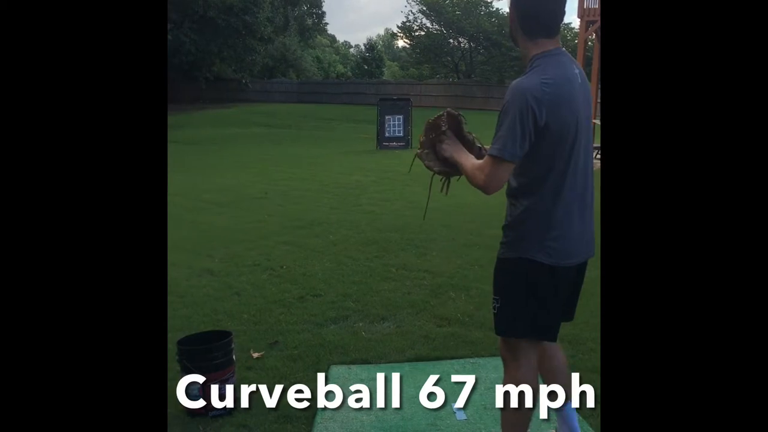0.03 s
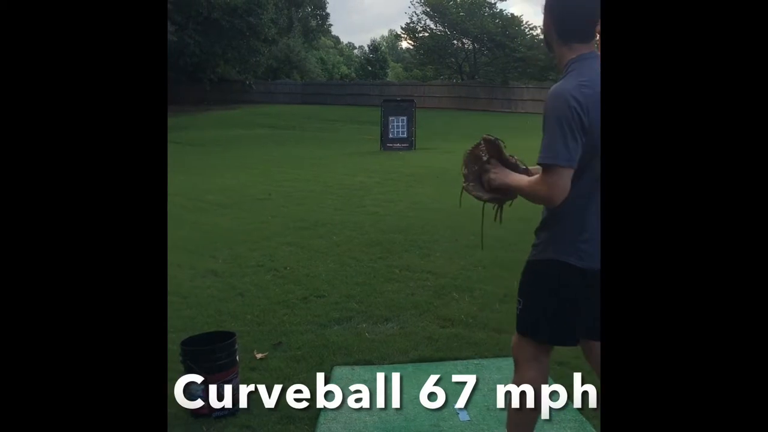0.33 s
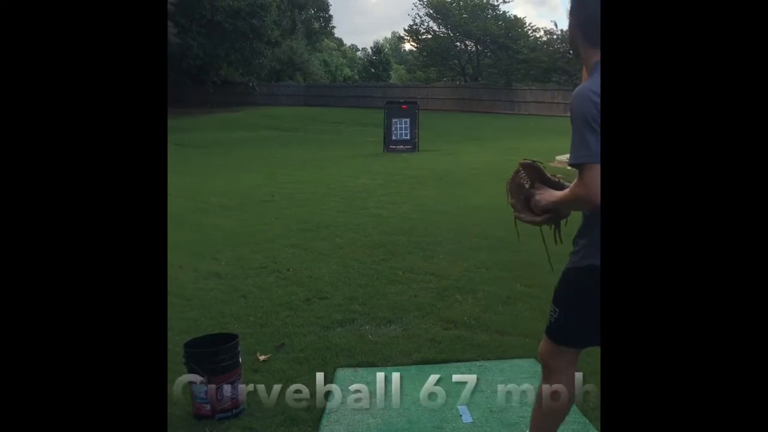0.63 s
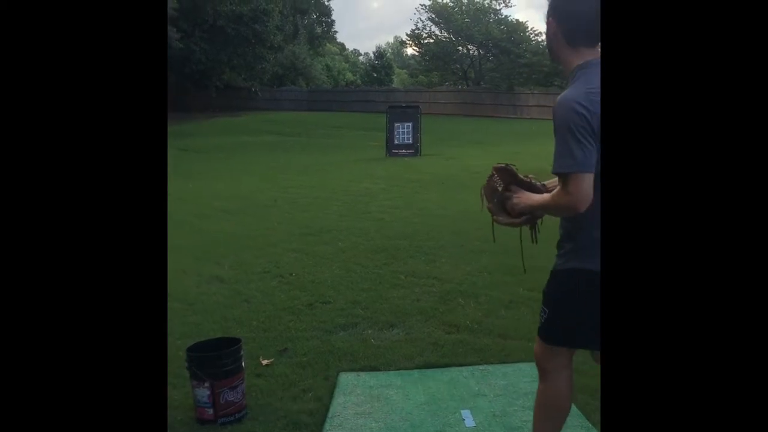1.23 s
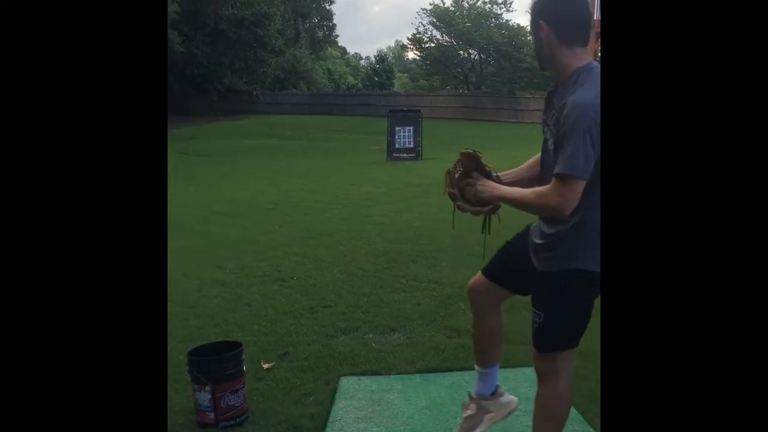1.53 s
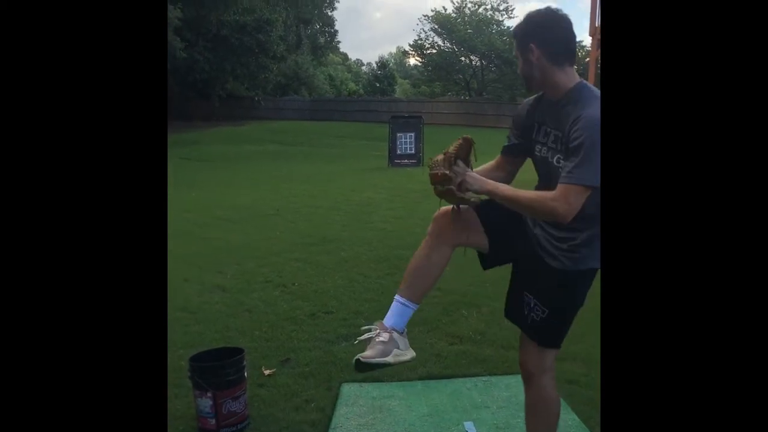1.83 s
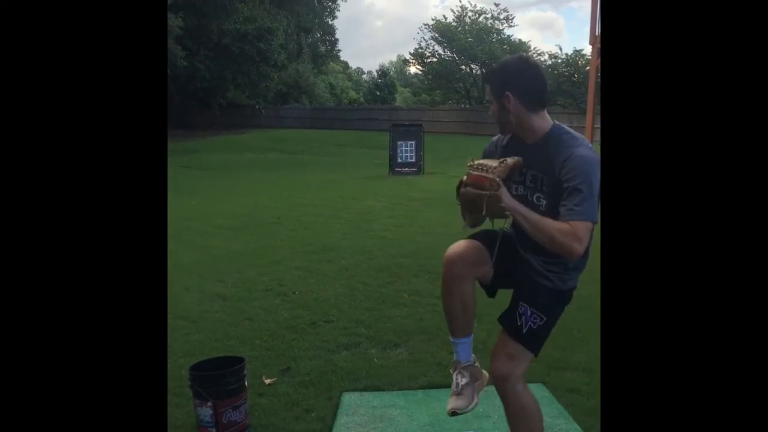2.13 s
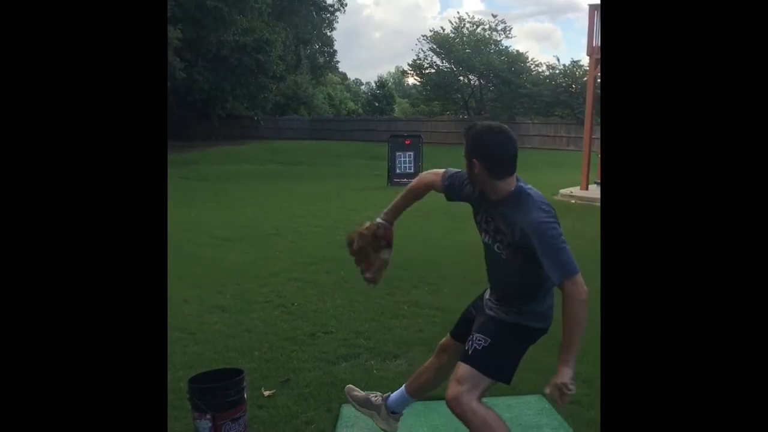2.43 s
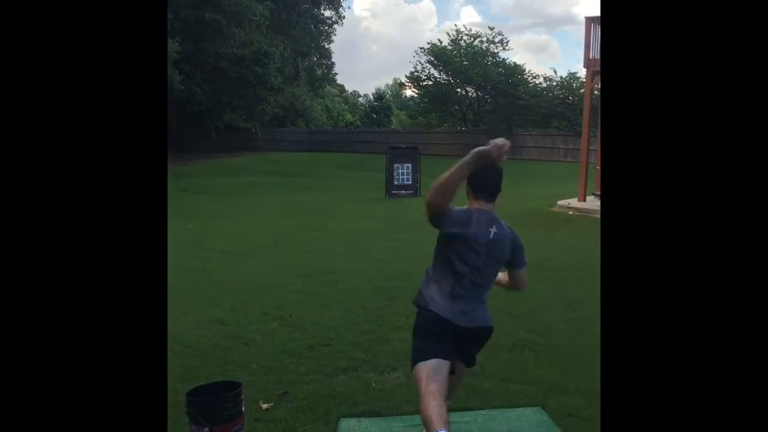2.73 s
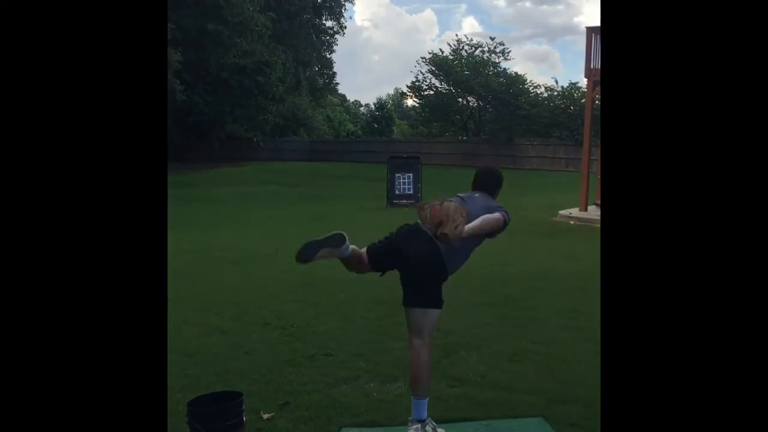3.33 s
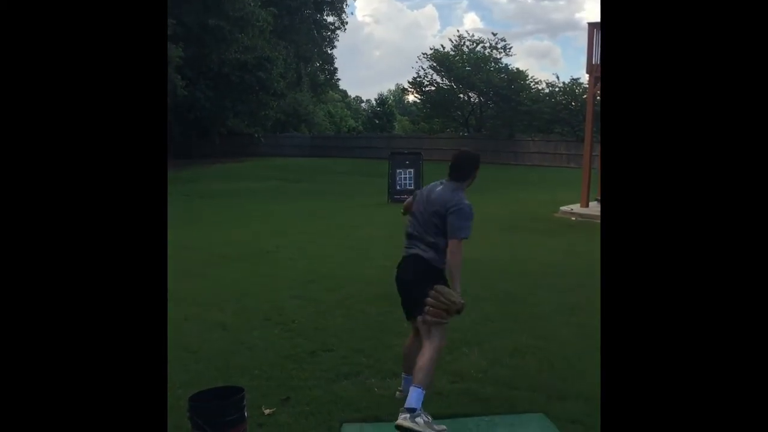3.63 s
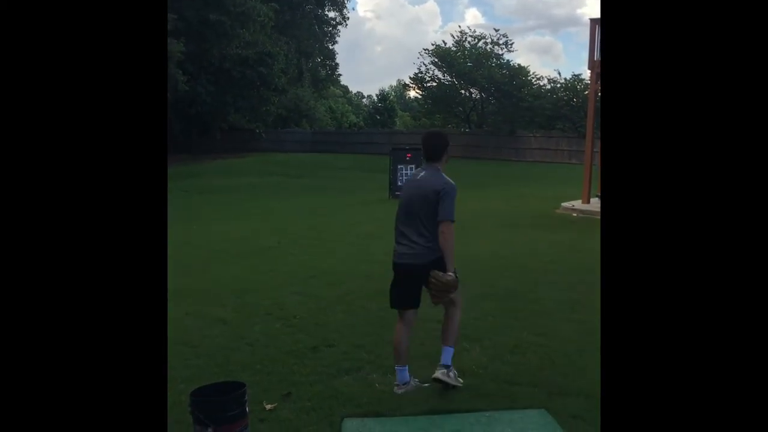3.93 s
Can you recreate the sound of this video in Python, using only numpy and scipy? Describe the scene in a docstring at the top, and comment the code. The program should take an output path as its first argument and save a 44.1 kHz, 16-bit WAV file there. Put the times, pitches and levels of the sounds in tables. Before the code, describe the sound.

A pitched baseball hits a backstop with one very loud, rattling bang that echoes around a quiet backyard. Before it come faint distant birds, then shoe scuffs, rustling clothes and the thud of a stride.

```python
"""Backyard pitch into a backstop

A pitcher winds up on a turf mat in a quiet yard, with birds calling far away. Shoes scuff,
clothes rustle and the stride lands with a thud. The ball bangs into the backstop: its panel
booms and rattles, its frame rings, and fence, house and trees throw the bang back."""
import sys
import numpy as np
from scipy import signal
from scipy.fft import rfft, irfft
from scipy.io import wavfile
from scipy.ndimage import uniform_filter1d

SR = 44100
rng = np.random.default_rng(int(sys.argv[2]) if len(sys.argv) > 2 else 0)


def to_wav(s):
    """Save 16-bit WAV."""
    ch = np.atleast_2d(s).T  # columns
    pcm = np.round(np.clip(ch, -1, 1) * 32767)  # PCM
    wavfile.write(sys.argv[1], SR, pcm.astype(np.int16))


N = 176400
T = np.arange(SR) / SR  # 1 s event clock
HIT_S, RESPONSE_LAG_S = 3.4893, 0.0013


def amp(db):
    """dB to gain."""
    return 10 ** (np.asarray(db) / 20)


def unit(x):
    """Scale to rms 1."""
    return x / np.sqrt(np.mean(x ** 2) + 1e-20)


def log_interp(points, hz):
    """Table lookup on a log-frequency axis."""
    f, value = np.transpose(points)
    return np.interp(np.log(hz + 1), np.log(f + 1), value)


def add(mix, start_s, sound):
    """Mix a sound in at start_s."""
    part = mix[max(round(start_s * SR), 0):][:len(sound)]
    part += sound[:len(part)]


def wander(span_s):
    """Random drift, rms 1, smoothed over span_s."""
    return unit(uniform_filter1d(rng.standard_normal(N), max(round(span_s * SR), 1)))


def noise(spectrum, tilt_db_oct=0, body_hz=None, size=SR, body_db=5, body_oct=0.58):
    """Shaped noise, rms 1, with optional tilt and broad resonance."""
    hz = np.fft.rfftfreq(size, 1 / SR)
    db = log_interp(spectrum, hz) + tilt_db_oct * np.log2(hz + 1)
    if body_hz:
        db += body_db * np.exp(-(np.log2((hz + 1) / body_hz) / body_oct) ** 2)
    return unit(irfft(rfft(rng.standard_normal(size)) * amp(db), size))


def decaying_noise(spectrum, t60s, window):
    """1 s of shaped noise, each band with its own T60."""
    hz, t, bands = signal.stft(noise(spectrum), SR, nperseg=window)
    decay = amp(-60 * t / log_interp(t60s, hz)[:, None])
    return signal.istft(bands * decay, SR, nperseg=window)[1][:SR]


# air spectrum: f/Hz, relative density/dB
AIR_SPECTRUM = [(15, -43), (25, -19.5), (59, 2), (80, -6.5), (114, -5.5), (256, -16.5), (285, -15.5),
                (489, -22.5), (575, -23), (887, -21), (1040, -23.5), (1190, -24.5), (9570, -43),
                (16000, -50.5)]

def air(level_db=-53):
    """Steady outdoor rumble and faint hiss."""
    return amp(level_db) * noise(AIR_SPECTRUM, size=N)


# bird notes: t/s, length/s, start f/Hz, end f/Hz, arch/Hz, level/dB
BIRD_NOTES = [(0.005, 0.052, 3170, 3110, 0, -67), (0.07, .055, 3120, 3430, 122, -64),
              (0.055, 0.12, 2570, 2600, 25, -66), (0.187, 0.07, 2430, 2680, -170, -64),
              (.26, 0.067, 2640, 2360, 39, -65), (0.688, .06, 3520, 3260, 30, -67),
              (0.754, 0.052, 2590, 2440, -20, -68), (1.112, 0.05, 2570, 2670, 0, -68.5)]

def birds(warble=0.014, echo_db=-3, echo_t60_s=0.45):
    """Distant arching, warbling whistles, blurred by the trees."""
    out = np.zeros(N)
    for start_s, length_s, from_hz, to_hz, arch_hz, db in BIRD_NOTES:
        progress = np.arange(0, length_s, 1 / SR) / length_s
        arch = np.sin(np.pi * progress)
        hz = from_hz + (to_hz - from_hz) * progress + arch_hz * arch
        hz *= 1 + warble * wander(0.0085)[:len(hz)]
        add(out, start_s, amp(db) * arch * np.sin(2 * np.pi * np.cumsum(hz) / SR))
    echo = rng.standard_normal(SR) * amp(-60 * T / echo_t60_s)
    return out + amp(echo_db) * signal.fftconvolve(out, echo / np.linalg.norm(echo))[:N]


# footfalls: t/s, f/Hz, level/dB, decay/s
FOOTFALLS = [(.215, 191.6, -44, 0.031), (0.421, 56, -45.5, 0.047), (0.544, 106, -42, 0.029),
             (.555, 51, -42, 0.048), (1.436, 204, -46, 0.017), (1.444, 63.7, -38, 0.045),
             (2.695, 210, -18.5, 0.0084), (2.712, 91, -26.5, 0.037), (2.7427, 125.6, -10.5, 0.0091),
             (2.743, 256, -17.5, 0.0054), (2.765, 64, -17, 0.021), (2.878, 77.6, -33.5, 0.025)]
# ground noise: f/Hz, relative density/dB
GROUND_SPECTRUM = [(30, -31), (100, 5), (350, -8.5), (700, -21.5), (2000, -57), (8000, -62)]
FOOT_RISE_S = 0.0018

def footfalls(dirt_db=-9):
    """Feet thud on mat and ground: a damped low tone plus dull noise."""
    out = np.zeros(N)
    for start_s, hz, db, decay_s in FOOTFALLS:
        thud = np.sin(2 * np.pi * hz * T) + amp(dirt_db) * noise(GROUND_SPECTRUM)
        envelope = np.minimum(T / FOOT_RISE_S, 1) * np.exp(-T / decay_s)
        add(out, start_s, amp(db) * envelope * thud)
    return out


# snaps: t/s, level/dB, tilt/(dB/oct)
SNAPS = [(.219, -47, 0), (1.647, -43, 1), (2.154, -48, 5), (2.285, -44, 4), (2.321, -32, -4.5),
         (2.356, -40.5, 12), (2.406, -36.5, 1), (2.607, -33, 8), (2.6343, -36, 4), (2.6459, -30.5, -5),
         (2.6525, -21.5, 0.5), (2.6737, -17.5, 8), (2.683, -28, 0.5), (2.694, -26, 2), (2.714, -34, 7),
         (2.7326, -23.5, -5.5), (2.741, -17, -4.5), (3.096, -40.5, 11), (3.27, -43, -3)]
# snap spectrum: f/Hz, relative density/dB
SNAP_SPECTRUM = [(300, -17.5), (1500, 15.5), (4000, 8), (9000, 2), (16000, -15)]

def snaps(decay_s=0.00038):
    """Cloth, glove laces and grass snap in sharp noise bursts."""
    out = np.zeros(N)
    for start_s, db, tilt in SNAPS:
        add(out, start_s, amp(db) * np.exp(-T / decay_s) * noise(SNAP_SPECTRUM, tilt))
    return out


# scuffs and hiss: peak t/s, rise/s, fall/s, level/dB, tilt/(dB/oct), body f/Hz
SWELLS = [(.222, 0.0057, 0.041, -56, 1.9, 2300), (.42, .08, 0.085, -69, 2, 4000),
          (1.355, .05, 0.076, -56, 1, 1920), (1.431, 0.0045, 0.0049, -43.5, 1.5, 840),
          (2.287, 0.0042, 0.007, -48.5, -2, 1600), (2.324, .007, 0.043, -50.5, -.5, 1560),
          (2.406, 0.003, 0.022, -53.5, -3.5, 1200), (2.53, 0.11, 0.067, -62, 0, 1300),
          (2.595, 0.0054, 0.051, -47.5, -4, 1130), (2.648, 0.0042, 0.012, -38, -2, 1270),
          (2.661, 0.0069, 0.021, -37, 0, 2920), (2.734, 0.042, 0.016, -38, 0, 1530),
          (2.775, 0.041, 0.039, -46, 0.5, 800), (2.845, .013, 0.032, -42.5, -2, 1250),
          (2.96, 0.13, 0.13, -56, .7, 1170), (2.962, 0.0089, .012, -48.5, -5.5, 1600),
          (3.195, 0.12, 0.054, -51, -1, 2260), (3.56, .018, .025, -34, -2, 9000),
          (3.96, .08, .15, -63, 6, 12000)]
# swell spectrum: f/Hz, relative density/dB
SWELL_SPECTRUM = [(200, -12), (600, -0.5), (1200, -2), (2300, -6), (3700, -7.5), (5000, -14), (6200, -8),
                  (7700, -15), (9400, -13.5), (10500, -17), (16000, -15.5)]

def scuffs_and_hiss(grain_db=2, grain_s=0.0007, clump_db=2, clump_s=0.007):
    """Swells of grainy noise: shoe and cloth scuffs, then high hiss trailing the bang."""
    out, t = np.zeros(N), np.arange(N) / SR
    for peak_s, rise_s, fall_s, db, tilt, body_hz in SWELLS:
        grains = unit(amp(grain_db * wander(grain_s) + clump_db * wander(clump_s)))
        swell = np.exp(-np.where(t < peak_s, ((t - peak_s) / rise_s) ** 2, (t - peak_s) / fall_s))
        out += amp(db) * swell * grains * noise(SWELL_SPECTRUM, tilt, body_hz, size=N)
    return out


def ring(modes):
    """Damped sines struck together."""
    return sum(amp(db - 60 * T / t60_s) * np.sin(2 * np.pi * hz * T) for hz, db, t60_s in modes)


# sole knocks: t/s, gain/dB
SOLE_KNOCKS = [(1.428, -1), (3.297, -3), (3.318, -1.5)]
# sole modes: f/Hz, level/dB, T60/s
SOLE_MODES = [(783, -44, 0.047), (930, -47, 0.043), (3460, -56, 0.038)]

def sole_knocks():
    """The sole knocks hollowly as the foot lands or rocks."""
    out = np.zeros(N)
    for start_s, db in SOLE_KNOCKS:
        add(out, start_s, amp(db) * np.minimum(T / FOOT_RISE_S, 1) * ring(SOLE_MODES))
    return out


# grazes: t/s, level/dB, decay/s, tilt/(dB/oct)
GRAZES = [(3.4585, -35.5, 0.0049, -1), (3.468, -38.5, 0.021, -1)]

def grazes():
    """A light tick and brush just before the bang."""
    out = np.zeros(N)
    for start_s, db, decay_s, tilt in GRAZES:
        add(out, start_s, amp(db) * np.exp(-T / decay_s) * noise(SWELL_SPECTRUM, tilt))
    return out


def ball_impact(level_db=-4, hz=960, rise_s=0.00024):
    """The ball pushes the target: one brief pressure pulse."""
    out = np.zeros(N)
    envelope = T / rise_s * np.exp(1 - T / rise_s)
    add(out, HIT_S, -amp(level_db) * envelope * np.sin(2 * np.pi * hz * T))
    return out


def high_pass(x, cutoff_hz=120):
    """Trims the low rumble from the boom and the knock."""
    return signal.sosfilt(signal.butter(2, cutoff_hz, "high", fs=SR, output="sos"), x)


# blows: t after hit/s, boom gain/dB, rattle gain/dB, sway level/dB
PANEL_BLOWS = [(0, 0.5, 2, -51), (0.026, -22, -18.5, -22), (0.094, -16.5, -22, -26.5)]
# panel modes: f/Hz, level/dB, T60/s
PANEL_MODES = [(182.3, -16.5, 0.14), (193, -8, 0.08), (261, -15.5, 0.11), (388, -24.5, 0.13),
               (447, -18, 0.053), (560, -3.5, 0.04)]
# rattle spectrum: f/Hz, relative density/dB
RATTLE_SPECTRUM = [(100, -25), (350, 3.5), (550, 2.5), (800, -3), (1050, -7.5), (1350, -1.5), (1750, -5),
                   (2250, -3.5), (2600, -8), (3250, -2), (3850, -11), (4600, -7), (5000, -15.5), (5400, -7),
                   (6800, -3), (9500, -13.5), (10600, -20.5), (16000, -21.5)]
# rattle decay before the hold envelope is applied: f/Hz, T60/s
RATTLE_DECAY = [(300, 0.049), (700, 0.085), (1400, 1), (3000, 0.75), (6000, 0.092), (9000, 0.087),
                (14000, .1)]

def panel(sway_hz=76, sway_decay_s=0.019, rattle_trim_db=-8.5,
          rise_s=0.00094, hold_s=0.032, release_s=0.013):
    """Struck, then swinging back, the panel booms and rattles; the whole backstop sways."""
    out = np.zeros(N)
    boom = high_pass(high_pass(ring(PANEL_MODES)))
    sway = np.exp(-T / sway_decay_s) * np.sin(2 * np.pi * sway_hz * T)
    hold_envelope = np.minimum(T / rise_s, 1) * np.exp(-np.maximum(T - hold_s, 0) / release_s)
    for after_s, boom_db, rattle_db, sway_db in PANEL_BLOWS:
        rattle = hold_envelope * decaying_noise(RATTLE_SPECTRUM, RATTLE_DECAY, window=256)
        blow = amp(boom_db) * boom + amp(sway_db) * sway + amp(rattle_trim_db + rattle_db) * rattle
        add(out, HIT_S + RESPONSE_LAG_S + after_s, blow)
    return out


# frame modes: f/Hz, relative level/dB, T60/s
FRAME_MODES = [(581, -9, .25), (887, -7, .3), (1150, -4, .45), (1235, -3, .3), (1290, -2, .28),
               (1367, -2, .24), (1425, -4, .3), (1470, -4, .32), (1557, 0, .28), (1874, -2, .27),
               (2093, -4, .28), (2166, -1, .28), (2274, -4, .3), (2362, -2, .17), (2560, -2, .16),
               (2748, -4, .25), (3312, -2, .18), (3462, -4, .2), (5260, -5, .15)]

def frame(gain_db=-20, waver=0.002, waver_s=0.03):
    """The frame rings on; its shaking bends the pitches."""
    out = np.zeros(N)
    for hz, db, t60_s in FRAME_MODES:
        cycles = np.cumsum(hz * (1 + waver * wander(waver_s)[:SR])) / SR
        tone = amp(gain_db + db - 60 * T / t60_s) * np.sin(2 * np.pi * cycles)
        add(out, HIT_S + RESPONSE_LAG_S + rng.uniform(0, 0.005), tone)
    return out


# echo spectrum: f/Hz, relative density/dB
ECHO_SPECTRUM = [(40, -17), (100, -4.5), (180, 7), (270, 0.5), (325, -10), (400, -3.5), (480, -5),
                 (580, 4.5), (670, 1.5), (770, -8.5), (1000, -3), (1400, -0.5), (1750, -1.5), (2200, -2),
                 (4000, -2.5), (6500, -7.5), (9000, -13), (10700, -20), (16000, -31)]
# echo decay: f/Hz, T60/s
ECHO_DECAY = [(60, 1.6), (200, 1.6), (600, 2.65), (2000, 2.26), (4000, 1.48), (8000, 1.06), (14000, 0.84)]

def yard_echo(gain_db=-20, rise_s=0.027, trees_db=1.5, trees_delay_s=0.25, trees_width_s=0.028):
    """Fence, house and trees scatter the bang into a noise tail; the tree line swells it."""
    out = np.zeros(N)
    swell_db = trees_db * np.exp(-((T - trees_delay_s) / trees_width_s) ** 2)
    envelope = amp(gain_db + swell_db) * np.minimum(T / rise_s, 1)
    add(out, HIT_S, envelope * decaying_noise(ECHO_SPECTRUM, ECHO_DECAY, window=1024))
    return out


# rebound modes: f/Hz, level/dB, T60/s
REBOUND_MODES = [(169, -18, 0.07), (240, -18, 0.048), (400, -23, .025), (720, -25, 0.016)]

def rebound(start_s=3.5845):
    """The ball drops back with a dull knock."""
    out = np.zeros(N)
    add(out, start_s, high_pass(ring(REBOUND_MODES)))
    return out


def scene():
    """Mono sum of all sources."""
    mix = air() + birds() + footfalls() + snaps() + scuffs_and_hiss() + sole_knocks()
    mix += grazes() + ball_impact() + panel() + frame() + yard_echo() + rebound()
    return mix[None]


def record(dry, knee=6, cutoff_hz=15900):
    """Soft input overload on the bang, then a low-pass."""
    clipped = dry / (1 + abs(dry) ** knee) ** (1 / knee)
    lowpass = signal.firwin(401, cutoff_hz, window=("kaiser", 8), fs=SR)
    return signal.oaconvolve(clipped, lowpass[None], "same")


dry = scene()
out = record(dry)
to_wav(out)
```